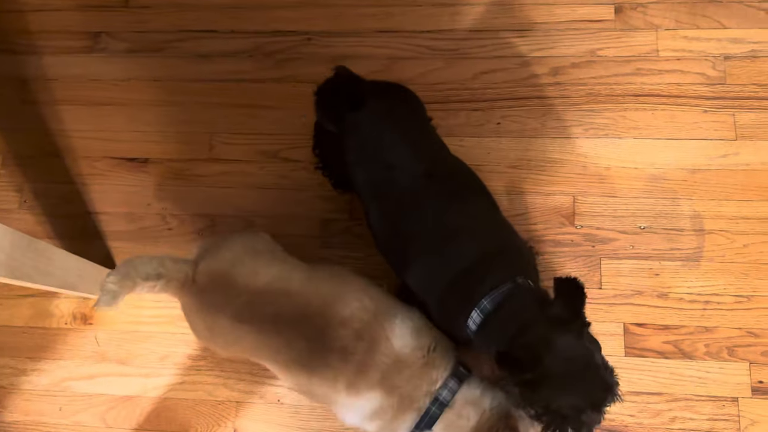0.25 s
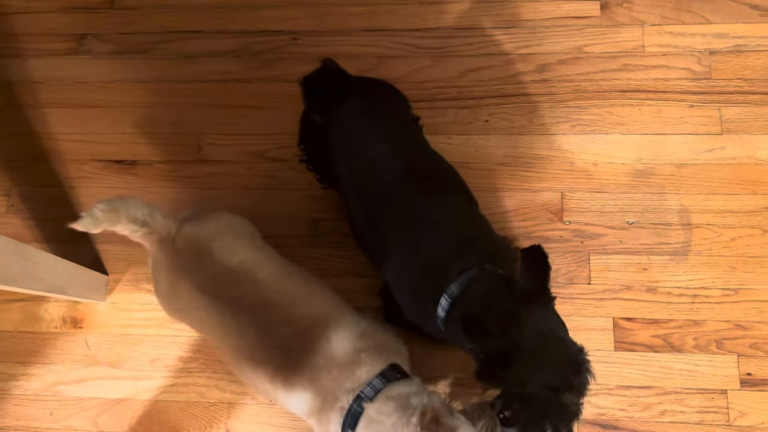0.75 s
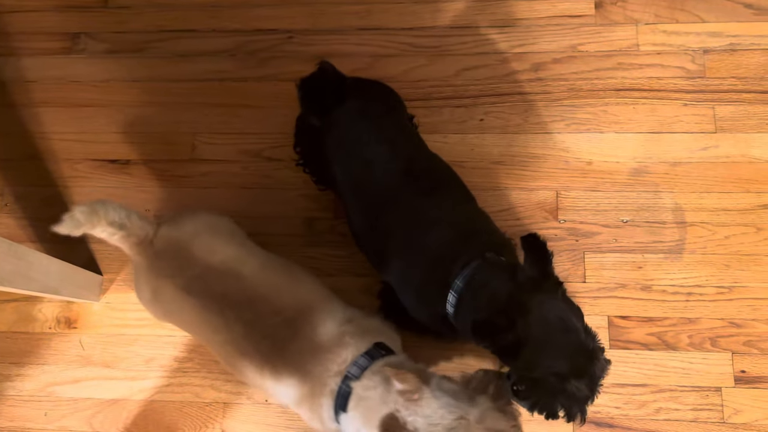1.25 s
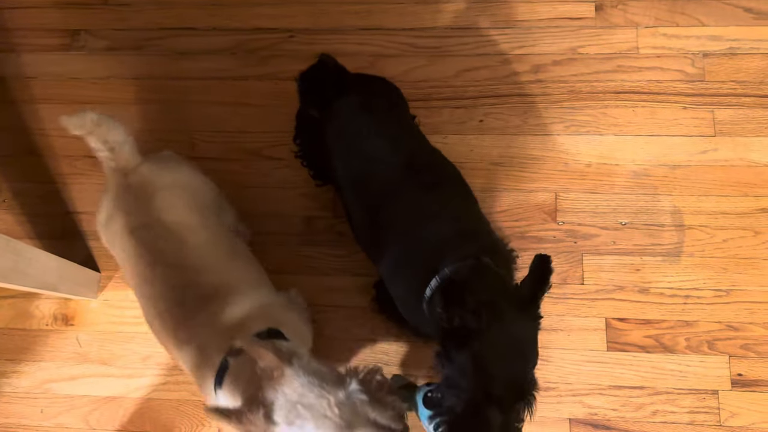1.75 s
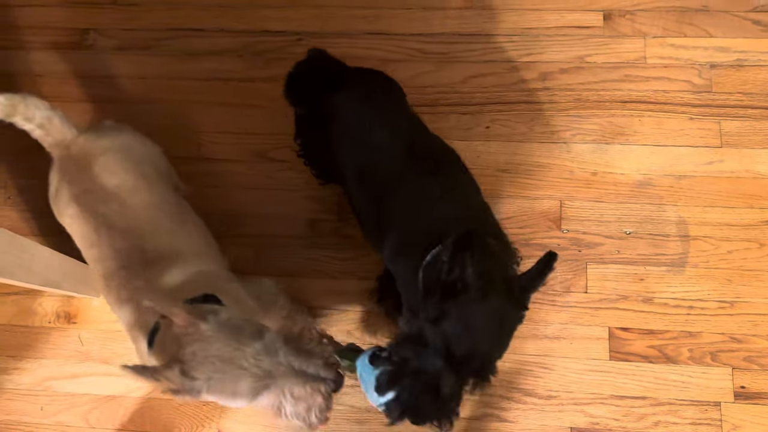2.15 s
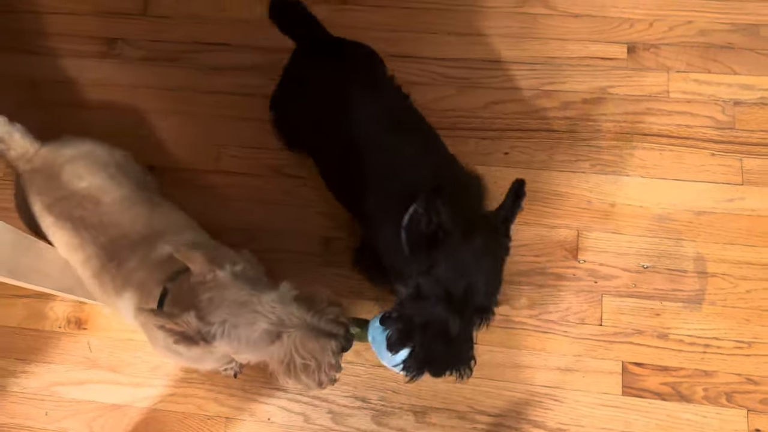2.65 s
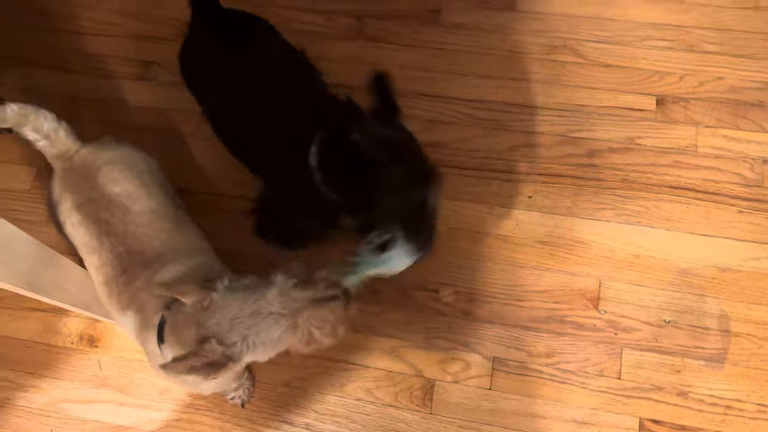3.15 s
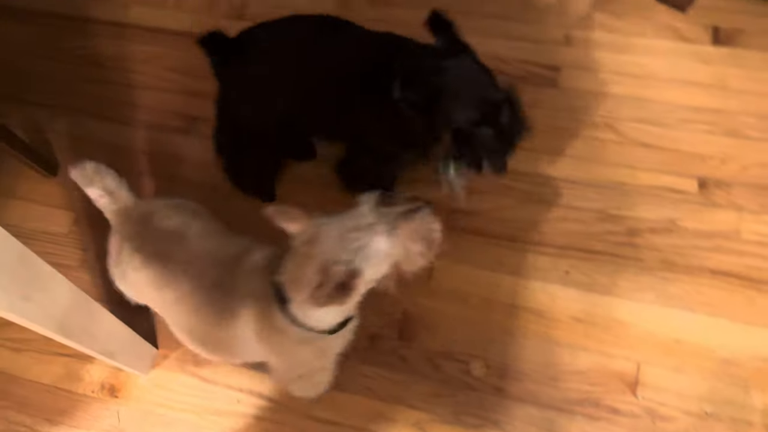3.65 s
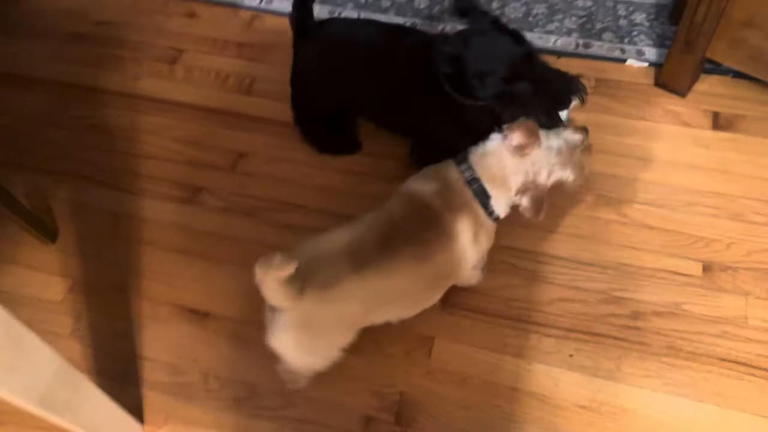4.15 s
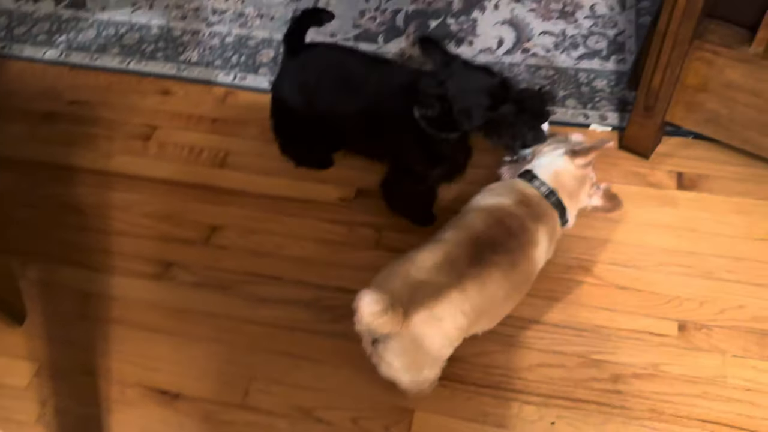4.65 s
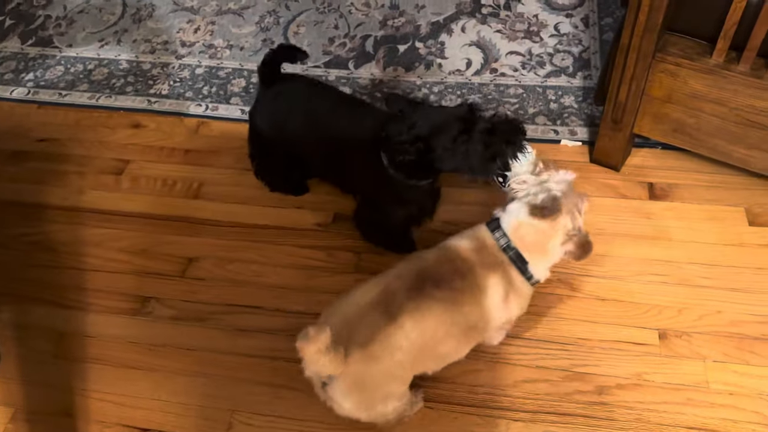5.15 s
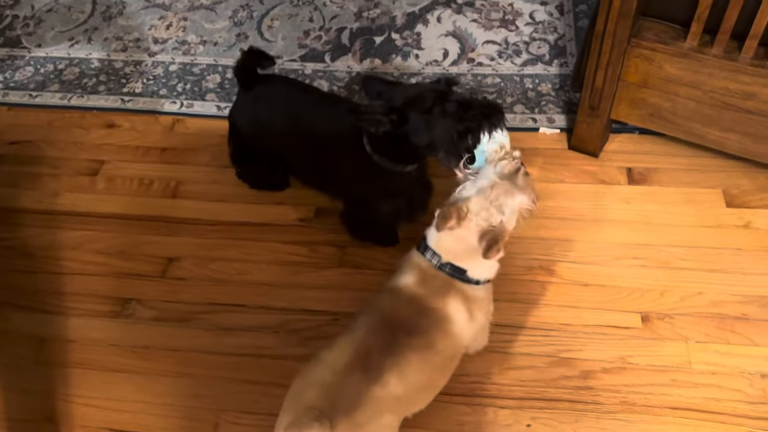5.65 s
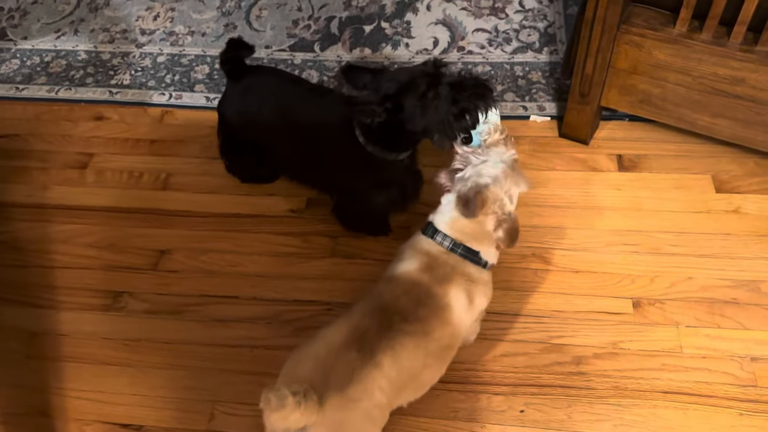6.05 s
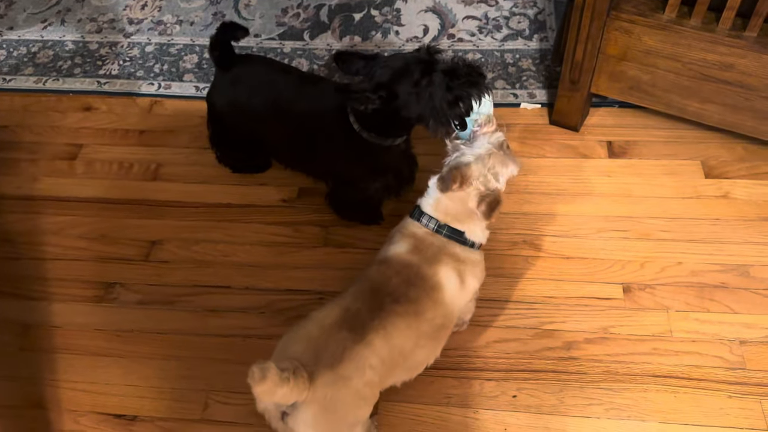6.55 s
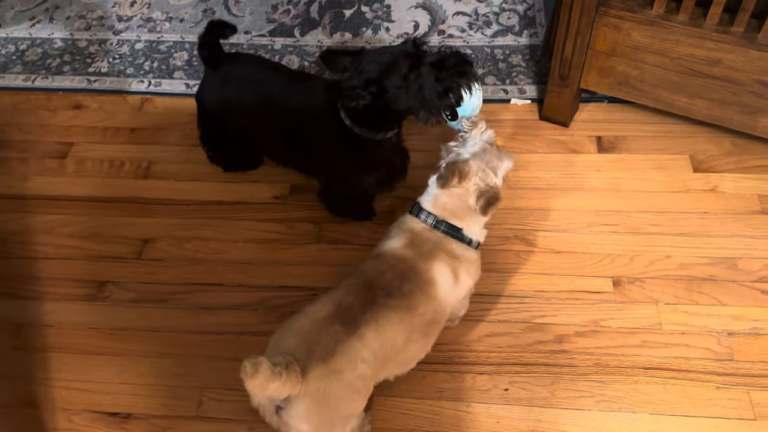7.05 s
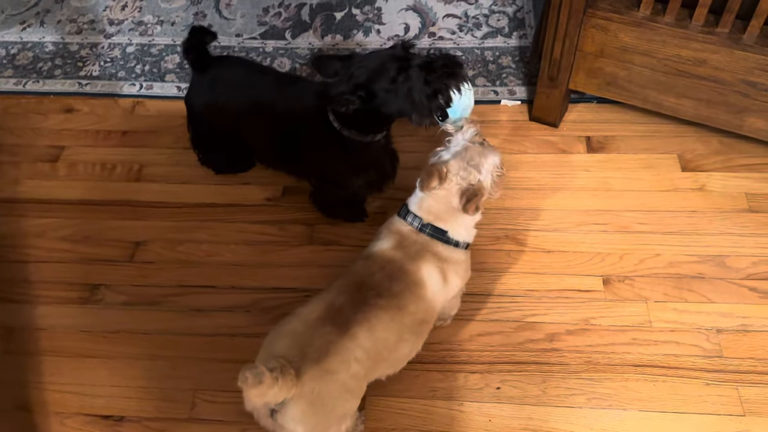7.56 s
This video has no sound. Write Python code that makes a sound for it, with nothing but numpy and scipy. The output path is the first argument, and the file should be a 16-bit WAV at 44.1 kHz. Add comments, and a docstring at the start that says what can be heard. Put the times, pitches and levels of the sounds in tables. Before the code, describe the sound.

A quiet indoor room with faint low ambience, heard close in stereo with short reflections off wooden floor and furniture. At 0 s a paw lands with a soft low boom, followed by a tiny rattling growl and snuffling. A growl rises at 0.5-0.8 s, with claw ticks and a scuff at its end. Nasal puffs fill 1.1-1.5 s. At 1.6-2.15 s a low rattle climbs into a snarl and sags. A stronger, higher growl runs 2.4-3.1 s, then a sharp, highest snarl at 3.3-3.7 s, amid clattering claws, scuffing pads and low floor rumble. Another snarl comes at 4-4.3 s with snuffles. Movement eases; lower growls rise at 4.7-5.25 and 5.4-5.7 s, with sparse ticks. A long, low, nearly level growl fills 6.1-7.05 s. The last begins near 7.3 s, smoother and swelling, still rising at the 7.8 s cutoff.

```python
"""Two terriers tug at a toy on a wooden floor in a quiet furnished room, growling through closed teeth.
First a paw booms on the boards and claws tick; a short rattling growl and soft snuffles follow.
Most growls then start as a low rattle and rise into a snarl, most of them highest past their middle and
then sagging; near the end comes a long low growl, then one still rising. Snuffles, ticks and scuffs run between.
Growls are fluttering vocal pulses sent through resonances; the other sounds are shaped noise, the boom a sine."""
import sys
import numpy as np
from scipy import signal
from scipy.fft import rfft, irfft, next_fast_len
from scipy.io import wavfile
from scipy.ndimage import uniform_filter1d, map_coordinates

SR = 44100
rng = np.random.default_rng(int(sys.argv[2]) if len(sys.argv) > 2 else 0)


def transcribe(signal):
    """Save signal, clipped to [-1, 1], as a 16-bit WAV file at the path in sys.argv[1]."""
    frames = np.atleast_2d(signal).T
    limited = np.clip(frames, -1, 1)
    pcm = np.round(limited * 32767).astype(np.int16)
    wavfile.write(sys.argv[1], SR, pcm)


N = 343539
TIME = np.arange(N) / SR  # s

# ringing of a claw, for ticks and snags: f/Hz, width/Hz, relative level/dB
CLAW_RINGING = [(2370, 1040, -0.5), (4740, 1640, 1.5), (6170, 1560, 5), (10800, 1180, 5.5),
                (13300, 3900, -2.5)]


def from_db(db):
    """Turn decibels into a gain."""
    return 10 ** (np.asarray(db) / 20)


def rms_one(x):
    """Scale to unit power."""
    return x / np.sqrt(np.mean(x ** 2) + 1e-20)


def in_time(rows):
    """Draw one curve over time per column of a table whose first column is t/s."""
    s, *columns = np.transpose(rows)
    return [np.interp(TIME, s, column) for column in columns]


def at_hz(points, hz):
    """Read a spectrum between its points on a log-frequency axis."""
    f, value = np.transpose(points)
    return np.interp(np.log(np.maximum(hz, 1)), np.log(f), value)


def drift(rate):
    """Smooth chance with spread 1, taking a new random value `rate` times a second."""
    knots = rng.standard_normal(8000)
    return rms_one(map_coordinates(knots, [TIME * rate], order=1, mode="wrap"))


def cut(x, hz, kind, order=4):
    """Keep only some frequencies, with a Butterworth filter."""
    return signal.sosfilt(signal.butter(order, hz, kind, fs=SR, output="sos"), x + 1e-18)


def resonate(x, modes):
    """Ring several resonances side by side, every second one upside down."""
    out = 0
    for k, (hz, width, db) in enumerate(modes):
        r = np.exp(-np.pi * width / SR)  # a wider resonance dies sooner
        top = [(1 - r * r) / 2, 0, (r * r - 1) / 2]
        bottom = [1, -2 * r * np.cos(2 * np.pi * hz / SR), r * r]
        out = out + (-1) ** k * from_db(db) * signal.lfilter(top, bottom, x + 1e-18)
    return out


def sliding(x, modes, ratio):
    """Slide resonances by a frequency ratio: stretch time, filter, and squeeze time back."""
    stretched = np.cumsum(ratio)
    slow = np.interp(np.arange(int(stretched[-1])), stretched, x)
    return np.interp(stretched, np.arange(len(slow)), resonate(slow, modes))


def swish(s, rise_s, fade_s):
    """Loudness curve of a soft event: it grows up to its moment, then fades."""
    return np.exp(-np.maximum((s - TIME) / rise_s, (TIME - s) / fade_s))


def even(x):
    """Hold the loudness steady while leaving pulses and flutter intact."""
    power = uniform_filter1d(uniform_filter1d(x ** 2, size=1800), size=1200)
    return x / np.sqrt(np.maximum(power, 1e-14))


def diffuse(colour, size=N):
    """Stereo noise of a given colour, alike left and right at both ends of the spectrum, unrelated between."""
    # how alike left and right are: f/Hz, likeness/0-1
    likeness = [(60, 1), (250, 0.7), (600, 0.24), (1200, 0.21), (4000, 0), (9000, 0), (15000, 1)]
    length = next_fast_len(size)
    hz = np.fft.rfftfreq(length, 1 / SR)
    mid, side = rfft(rng.standard_normal((2, length))) * from_db(at_hz(colour, hz))
    alike = np.clip(at_hz(likeness, hz), -1, 1)
    left_right = np.sqrt(1 + alike) * mid + np.sqrt(1 - alike) * side * [[1], [-1]]
    return irfft(left_right)[:, :size]


def ambience(level_db=-57.5):
    """The quiet room: steady noise, strongest in the lower frequencies."""
    # colour of the quiet room: f/Hz, relative level per Hz/dB
    quiet_colour = [(35, -38), (60, -10.5), (107, -6), (216, 1.5), (345, -6), (647, -10.5), (799, -6),
                    (1030, -13.5), (1460, -14.5), (2810, -26.5), (4380, -53), (5530, -23.5), (9460, -36),
                    (15800, -40)]
    return from_db(level_db) * rms_one(diffuse(quiet_colour))


def room(x, gap_s=0.0025, early_db=4, early_s=0.007):
    """Dense reflections, strong at first from floor and furniture, dying band by band."""
    # time to die away by 60 dB before the early boost: f/Hz, time/s
    dying_time = [(100, 0.28), (300, 0.63), (1000, 0.33), (4000, 0.34), (14000, 0.15)]
    # strength of the reflections: f/Hz, level/dB
    send_level = [(100, -4), (300, -9.5), (800, -5), (2000, 3.5), (6000, 1.5), (14000, -5)]
    t = TIME[:SR * 2 // 3]
    noise, tail = diffuse([(20, 0), (20000, 0)], size=len(t)), 0
    shape = np.clip(t / gap_s - .5, 0, 1) * (1 + from_db(early_db) * np.exp(-t / early_s))
    edges = 60 * 2. ** np.arange(9)  # Hz, bands one octave wide
    for low, high in zip(edges, edges[1:]):
        hz = np.sqrt(low * high)
        decay = shape * np.exp(-np.log(1000) * t / at_hz(dying_time, hz))
        band = cut(noise, [low, high], "band", order=3) * decay / np.linalg.norm(decay)
        tail = tail + band * from_db(at_hz(send_level, hz))
    return signal.fftconvolve(x[None], tail, axes=1)[:, :N]


def tread():
    """The floor rumbles as low noise, most while the dogs change places."""
    # strength of the rumble: t/s, level/dB
    rumble_level = [(0.0, -54), (0.3, -60), (2.0, -65), (3.3, -49), (4.2, -52), (4.8, -57.5), (7.79, -77)]
    # colour of the rumble: f/Hz, relative level per Hz/dB
    rumble_colour = [(20, -56), (35, -17), (52, -6.5), (85, -11), (130, -14.5), (300, -17), (1000, -43)]
    return from_db(in_time(rumble_level)[0]) * rms_one(diffuse(rumble_colour))


def thump(rise_s=0.0044):
    """A paw lands heavily and the lowest mode of the wooden floor booms: a fading sine."""
    # the landing, one row: t/s, f/Hz, level/dB, fade/s
    landing = (0.02, 87.5, -41, 0.1)
    s, hz, db, fade_s = landing
    return from_db(db) * swish(s, rise_s, fade_s) * np.sin(2 * np.pi * hz * TIME)


def scuffs(tug, level_db=1, grain_db=3, tug_db=-8, snags_per_s=30, snag_db=16, snag_s=0.0011):
    """Pads, fur and fabric rub in short grains: single scuffs, the toy in the teeth, and snagging claws."""
    # paws and toy scuffing: t/s at the peak, relative level/dB, fade/s
    scuff_rows = [(0.01, -56.5, 0.071), (.17, -56, 0.018), (.81, -48.5, .07), (1.21, -60, 0.022),
                  (1.33, -56.5, 0.15), (1.44, -58, 0.071), (2.1, -48.5, 0.028), (3.13, -45, 0.26),
                  (3.46, -38, 0.078), (3.63, -38.5, 0.1), (3.84, -45.5, 0.059), (3.95, -50.5, 0.24),
                  (4.21, -43.5, .13), (4.47, -56.5, 0.097), (5.27, -49, 0.18), (5.7, -57, .15),
                  (5.95, -55, 0.058), (6.51, -61.5, 0.099), (7.79, -108, 0.071)]
    # colour of rubbing pads and fabric: f/Hz, relative level per Hz/dB
    rub_colour = [(880, -25), (1500, 0), (2340, -7), (3860, -5), (5290, -11.5), (6910, -8.5), (8490, -11.5),
                  (11300, -16), (15000, -32.5), (15800, -50)]
    rise_s = 0.047
    # where scuffs overlap, the loudest counts
    strokes = np.max([from_db(db) * swish(s, rise_s, fade_s) for s, db, fade_s in scuff_rows], axis=0)
    level = np.hypot(from_db(level_db) * strokes, from_db(tug_db) * tug)
    rub = rms_one(diffuse(rub_colour) * from_db(grain_db * drift(250)))
    catches = (rng.random(N) < snags_per_s / SR) * rng.random(N)
    snag_level = signal.lfilter([1], [1, -np.exp(-1 / (snag_s * SR))], catches + 1e-18)
    snags = snag_level * rng.standard_normal(N)
    return level * (rub + from_db(snag_db) * resonate(snags, CLAW_RINGING))


def claws(level_db=0, touch_s=0.001, tick_s=0.0024, skid_s=0.027, skid_db=-14):
    """A claw lands with a sharp tick of noise, skids briefly and knocks the board."""
    # claws on the boards: t/s, burst level before ringing/dB, extra level of the low knock/dB
    claw_rows = [(0.0465, -60.5, 22), (0.8149, -34.5, 3), (0.8355, -36.5, 0.5), (0.9596, -55.5, 10),
                 (1.2023, -52, -10), (1.302, -50, -10), (1.4812, -52.5, -1), (1.81, -44.5, -19),
                 (1.9932, -42.5, -6), (3.1175, -36, -8), (3.1449, -30, -2.5), (3.1881, -34.5, -2),
                 (3.257, -33.5, -3), (3.4481, -43, -7), (3.6038, -31, 12), (3.6541, -37, -13),
                 (3.827, -41, 8.5), (3.9368, -43, -15), (4.34, -47, -19), (4.462, -49.5, 1),
                 (5.264, -44, 6), (5.3518, -49.5, -4), (5.7198, -52.5, 13), (5.9089, -54, 3),
                 (6.0037, -46.5, -11), (6.472, -45, -8)]
    # ringing of the boards: f/Hz, width/Hz, relative level/dB
    board_ringing = [(820, 470, 7.5), (1340, 1700, -1.5)]
    t = TIME[:SR // 12]
    shape = (1 - np.exp(-t / touch_s)) * (np.exp(-t / tick_s) + from_db(skid_db) * np.exp(-t / skid_s))
    ticks, knocks = np.zeros((2, N + len(t)))
    for s, db, knock_db in claw_rows:
        burst = from_db(db) * rng.standard_normal(len(t)) * shape / shape.max()
        i = int(s * SR)
        ticks[i:i + len(t)] += burst
        knocks[i:i + len(t)] += burst * from_db(knock_db)
    return from_db(level_db) * (resonate(ticks, CLAW_RINGING) + resonate(knocks, board_ringing))[:N]


def snuffles(level_db=-4, nose_db=-5, nose_width_hz=260, flicker_db=2):
    """The dogs' quick puffs against the toy: broad rustle and a sliding nasal resonance."""
    # puffs through the nose: t/s at the peak, relative level/dB, fade/s, nasal resonance f/Hz
    puff_rows = [(0.166, -46, 0.21, 1220), (.27, -46.5, 0.16, 880), (0.519, -53, 0.077, 1130),
                 (1.092, -51.5, 0.1, 920), (1.164, -44.5, 0.095, 856), (1.315, -41.5, 0.072, 840),
                 (1.45, -49, 0.022, 866), (2.24, -46, 0.069, 875), (3.73, -45.5, .13, 930),
                 (3.89, -49.5, 0.074, 1090), (4.37, -44, .07, 1210), (4.51, -49, 0.066, 1340)]
    # colour of air through the nose: f/Hz, relative level per Hz/dB
    nose_colour = [(180, -49), (300, -5), (384, -30), (417, -8), (506, -22), (656, -9), (753, -6),
                   (1220, -10), (1520, -10.5), (1970, -15.5), (8000, -30.5), (10400, -62), (17600, -120)]
    rise_s = 0.036
    puffs = np.array([from_db(db) * swish(s, rise_s, fade_s) for s, db, fade_s, hz in puff_rows])
    level = puffs.max(axis=0)
    centre_hz = in_time(puff_rows)[-1]
    middle_hz = np.mean(centre_hz)
    air = diffuse(nose_colour)
    resonance = [(middle_hz, nose_width_hz, 0)]
    nose = np.array([sliding(side, resonance, centre_hz / middle_hz) for side in air])
    breath = from_db(level_db) * rms_one(air) + from_db(nose_db) * rms_one(nose)
    return level * from_db(flicker_db * drift(57)) * breath


def gesture():
    """Each growl swells or eases, changes the baring of its teeth and sags: pitch, muzzle and five voices."""
    # pitch curves, one list per growl: t/s, f/Hz
    pitch_curves = [
        [(.16, 143.3), (.23, 112)],
        [(.54, 111.3), (.62, 127.1), (.67, 151), (.7, 179.5), (.84, 164.9)],
        [(1.57, 117.5), (1.82, 122.4), (1.85, 178.7), (2.04, 212.2), (2.17, 181.3)],
        [(2.38, 132.2), (2.44, 143), (2.48, 210.6), (2.61, 250.6), (2.9, 260.2), (2.97, 274.7), (3.04, 265.3),
         (3.1, 167.9)],
        [(3.285, 125.1), (3.305, 145), (3.322, 293.2), (3.37, 329.4), (3.43, 302.8), (3.49, 291.5),
         (3.56, 308.8), (3.63, 311.6), (3.7, 198.4)],
        [(3.99, 139.2), (4.04, 222.8), (4.12, 249), (4.19, 252.3), (4.34, 201.9)],
        [(4.68, 109.6), (4.92, 119.3), (5.08, 137), (5.12, 202.1), (5.2, 207.7), (5.27, 152.6)],
        [(5.44, 109.3), (5.53, 119.8), (5.56, 179.8), (5.62, 180.8), (5.69, 158.8)],
        [(6.11, 111.1), (6.25, 116.4), (6.6, 119.4), (6.95, 118.2), (7.05, 93.9)],
        [(7.26, 128.1), (7.36, 140.3), (7.5, 146.1), (7.62, 162.4), (7.73, 169.8), (7.79, 194.6)],
    ]
    # growls: start t/s, length/s, swell/dB, then voice levels before effort and trim: chest/dB, mouth/dB,
    # lips/dB, palate/dB, teeth/dB; baring of the teeth at the end/dB, roughness at the top pitch/0-1,
    # mouth frequency ratio at the start, the same at the end, throat resonance/dB
    growl_rows = [ (0.152, 0.085, 5, -36.5, -40.5, -41.5, -52, -64, -2, 0.9, 0.99, 1.7, -27),
                  (0.536, 0.27, 5, -32, -37, -50.5, -53.5, -56.5, 11, 0.61, 1.19, 1.05, -19),
                  (1.559, 0.59, -0.5, -30, -30.5, -48.5, -55, -54, 15.5, 0.37, 1.025, 0.99, -12.5),
                  (2.373, 0.72, 5.5, -25.5, -19.5, -39, -43, -47.5, 4.5, .1, 0.98, 1.133, -10.5),
                  (3.278, 0.43, 0, -24.5, -20, -34.5, -38, -46.5, 4.5, .37, 0.98, 1.07, -19),
                  (3.981, 0.35, -3.5, -30, -29, -38, -49.5, -54, 12, 0.23, 0.99, 1.04, -8.5),
                  (4.667, 0.595, 8.5, -32, -37.5, -42.5, -53, -55.5, 8.5, .32, 1.094, 0.94, -7),
                  (5.434, 0.25, 1, -33, -40.5, -44.5, -52.5, -54, 11, 0.47, 0.98, 1.06, -6.5),
                  (6.108, 0.95, -2, -36, -41.5, -47.5, -56, -59, -3.5, .54, 1.045, 1.0, -6.5),
                  (7.258, 0.73, 14, -31, -30, -51, -48, -52.5, -7, .17, 0.94, 0.88, -2)]
    # barking pushes within a growl: t/s, extra effort/dB, half length/s
    push_rows = [(2.666, 3, 0.17), (3.344, 9, 0.033), (4.205, 3.5, 0.069), (7.79, 7, 0.046)]
    attack_s, release_s = 0.017, 0.034
    onset_db, onset_share = 10.5, 0.084  # pressure still builds over this share of a growl's length
    sag_db, sag_s = 7, 0.057  # pressure runs out before the release
    chest_follows, rasp_follows = 0.84, 0.69  # share of the effort in chest; in lips, palate and teeth
    baring_s, lips_follow = 0.12, 0.084  # lip resonances shift by this share of the baring in dB
    palate_baring, teeth_baring = 0.96, 0.13  # share of the baring that reaches these levels
    lip_ratio = 1.012  # frequency ratio of the lips at rest
    rough_power = 1.4  # slack folds rattle: roughness grows as this power of the period

    rows = np.array(growl_rows)
    which = np.maximum(np.searchsorted(rows[:, 0], TIME + attack_s) - 1, 0)
    (start, length, swell, chest, mouth, lips, palate, teeth,
     bare, top_rough, jaw_from, jaw_to, throat_db) = rows[which].T
    age, left = np.maximum(TIME - start, 0), np.maximum(start + length - TIME, 0)
    progress = np.minimum(age / length, 1)
    gate = np.minimum(age / attack_s, 1) * np.minimum(left / release_s, 1)

    effort = swell * (progress - .5)
    effort = effort - onset_db * np.exp(-progress / onset_share) - sag_db * np.exp(-left / sag_s)
    effort = effort + sum(db * np.exp(-((TIME - s) / half_s) ** 2) for s, db, half_s in push_rows)
    baring = bare * np.exp(-(left / baring_s) ** 2)
    rasp = rasp_follows * effort
    levels = gate * from_db([chest + chest_follows * effort,
                             mouth + effort,
                             lips + rasp + baring,
                             palate + rasp + palate_baring * baring,
                             teeth + rasp + teeth_baring * baring])

    pitch, = in_time([point for curve in pitch_curves for point in curve])
    top = np.array([max(hz for s, hz in curve) for curve in pitch_curves])[which]
    rough = np.clip(top_rough * (top / pitch) ** rough_power, 0, 1)
    jaw = jaw_from + (jaw_to - jaw_from) * progress ** 2
    curl = lip_ratio * from_db(lips_follow * baring)
    return pitch, rough, jaw, curl, from_db(throat_db), levels


def folds(pitch, rough, flutter_hz=24, flutter_swing=.04, flutter_db=2.0, wander=.027, jitter=.075,
          shimmer_db=6.0):
    """Vocal pulses, uneven and fluttered by soft tissue, with their puffs of air and low hum."""
    # how strongly chest and neck radiate the lowest harmonics: f/Hz, relative level/dB
    chest_spectrum = [(90, 2), (120, 3.5), (180, 4.5), (245, 6), (285, -4), (340, -18.5), (420, -14),
                      (540, -33)]
    flutter = np.sin(2 * np.pi * np.cumsum(flutter_hz * (1 + .025 * drift(8))) / SR)
    bend = flutter_swing * flutter + wander * rough * drift(90)
    cycles = np.cumsum(pitch * (1 + bend)) / SR
    at = np.flatnonzero(np.diff(np.floor(cycles)))  # one pulse per completed cycle
    chance = rng.standard_normal((len(at), 2))
    shift = jitter * rough[at] * chance[:, 0] * SR / pitch[at]
    when = np.clip(at + shift, 0, N - 1).astype(int)
    shimmer = shimmer_db * rough[at] * np.clip(chance[:, 1], -2, 2)
    force = from_db(flutter_db * flutter[at] + shimmer)
    pulses = np.zeros(N)
    pulses[when] = force
    # each opening lets out a puff of turbulent air that fades in about 3 ms
    puffs = signal.lfilter([1], [1, -np.exp(-1 / (0.003 * SR))], pulses)
    # the smooth part of the airflow holds the lowest harmonics and varies less from pulse to pulse
    hum = sum(from_db(at_hz(chest_spectrum, k * pitch)) * np.cos(2 * np.pi * k * cycles)
              for k in range(1, 4))
    hum_force = np.interp(np.arange(N), at, force ** 0.87)
    return even(pulses), even(puffs * rng.standard_normal(N)), even(hum * hum_force)


def growls(pitch, rough, jaw, curl, throat, levels, chest_db=0, mouth_db=-2.76, lips_db=-3.6,
           palate_db=-5.5, teeth_db=-3.5, mouth_air=0.65, lip_air=1.0, palate_air=1.45, teeth_air=3.5):
    """The same pulses hum in the chest, ring in the mouth, snarl past lips and palate and hiss at the teeth."""
    # resonances of mouth, throat, lips, palate and teeth, each: f/Hz before sliding, width/Hz before
    # sliding, relative level/dB
    mouth_modes = [(683, 101, 0.5), (803, 98.7, 1.5), (961, 144, -8)]
    throat_modes = [(520, 247, 0)]
    lip_modes = [(1275, 250, 11), (1511, 180, 1.5)]
    palate_modes = [(1950, 180, 3.5), (2290, 520, -6), (2595, 51, -6), (3589, 820, -17.5)]
    teeth_modes = [(5610, 860, 6), (6180, 1690, 1), (11100, 1100, -4), (14100, 2300, -12)]
    # share of the jaw's slide that these take, as a power; palate frequency ratio with the jaw at rest
    palate_follows, teeth_follow, palate_ratio = 0.88, 0.2, 1.008

    pulses, air, hum = folds(pitch, rough)
    chest, mouth, lips, palate, teeth = levels
    rough_air = rough * air

    flow = pulses + mouth_air * rough_air
    vowel = sliding(flow, mouth_modes, jaw) - throat * resonate(flow, throat_modes)
    vowel = cut(vowel, [400, 1180], "band")

    lip_snarl = sliding(pulses + lip_air * rough_air, lip_modes, curl)
    lip_snarl = cut(lip_snarl, [1050, 1800], "band", order=2)

    palate_slide = palate_ratio * jaw ** palate_follows
    palate_snarl = sliding(pulses + palate_air * rough_air, palate_modes, palate_slide)
    palate_snarl = cut(palate_snarl, [1700, 3300], "band", order=2)

    hiss = cut(pulses + teeth_air * air, 4810, "high", order=6)
    hiss = sliding(hiss, teeth_modes, jaw ** teeth_follow)

    out = from_db(chest_db) * chest * hum
    out += from_db(mouth_db) * mouth * even(vowel)
    out += from_db(lips_db) * lips * even(lip_snarl)
    out += from_db(palate_db) * palate * even(palate_snarl)
    return out + from_db(teeth_db) * teeth * even(hiss)


def scene(growl_pan_db=0.55, claw_pan_db=3.0):
    """Growls and claws a little to the left, with the room and the softer sounds around them."""
    pitch, rough, jaw, curl, throat, levels = gesture()
    voice, feet = growls(pitch, rough, jaw, curl, throat, levels), claws()
    direct = voice * from_db([[growl_pan_db], [-growl_pan_db]])
    direct = direct + feet * from_db([[claw_pan_db], [-claw_pan_db]])
    floor = tread() + thump()
    toy_tug = levels[-1]  # the toy's chafing rises and falls with the hiss at the teeth
    return direct + room(voice + feet) + snuffles() + scuffs(toy_tug) + floor + ambience()


def record(dry):
    """Cut the top steeply with an elliptic low-pass filter."""
    cutoff_hz = 15850
    return signal.sosfilt(signal.ellip(12, .2, 80, cutoff_hz, fs=SR, output="sos"), dry)


dry = scene()
out = record(dry)
transcribe(out)
```